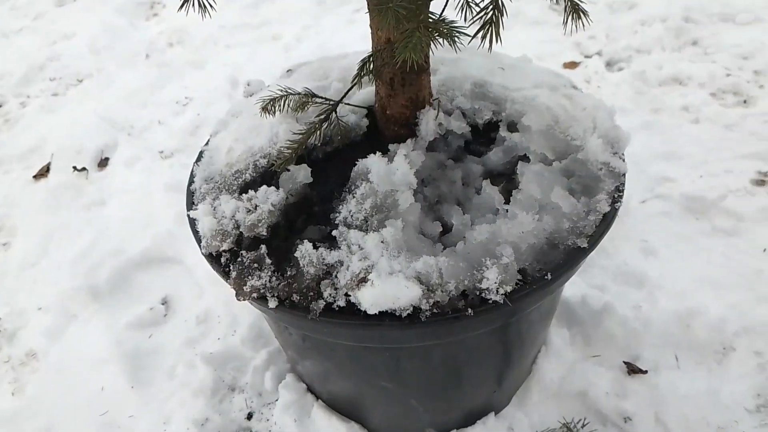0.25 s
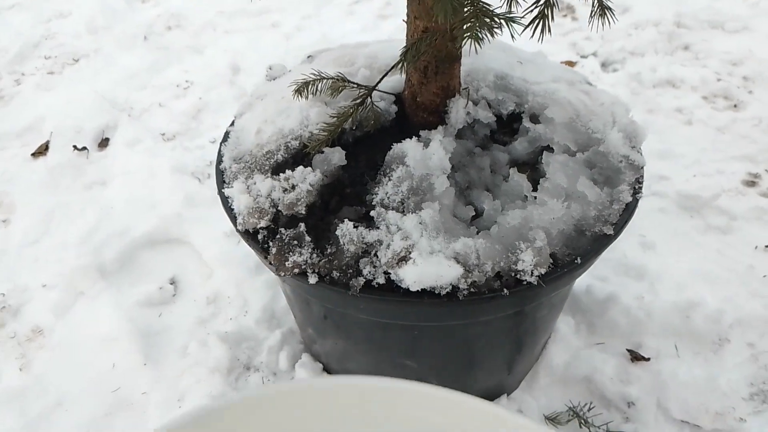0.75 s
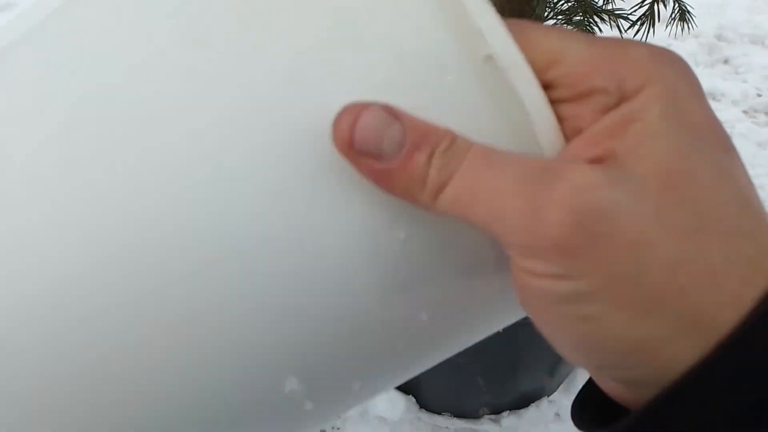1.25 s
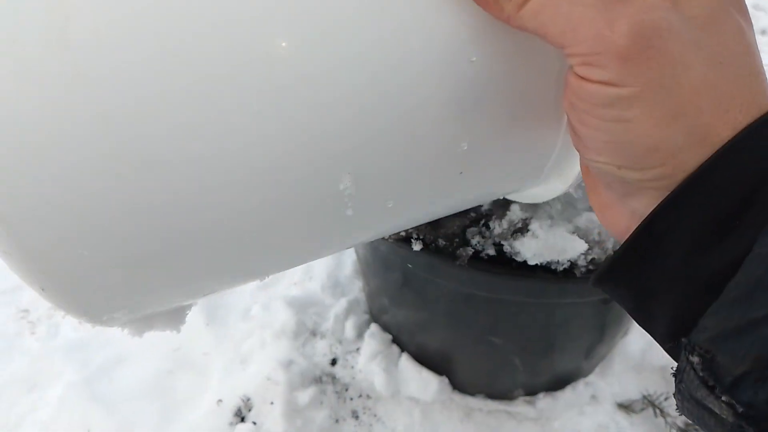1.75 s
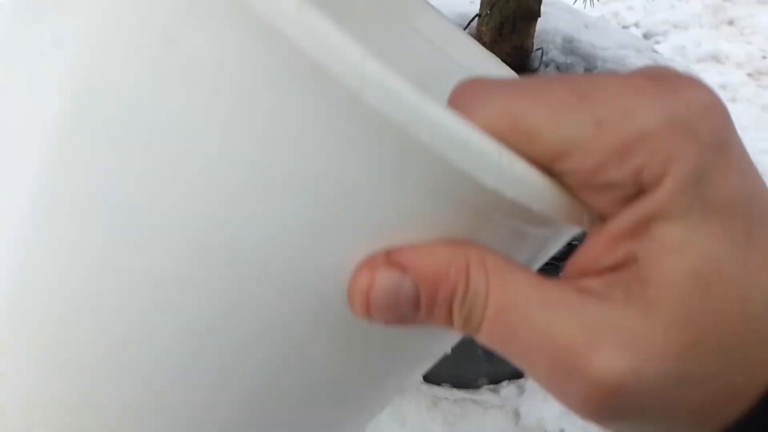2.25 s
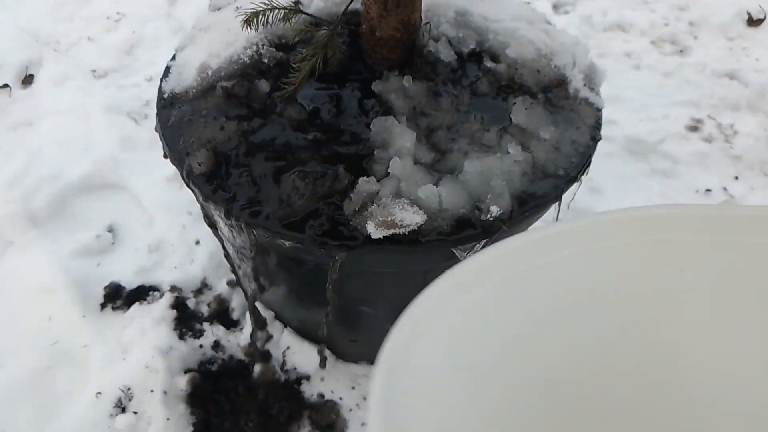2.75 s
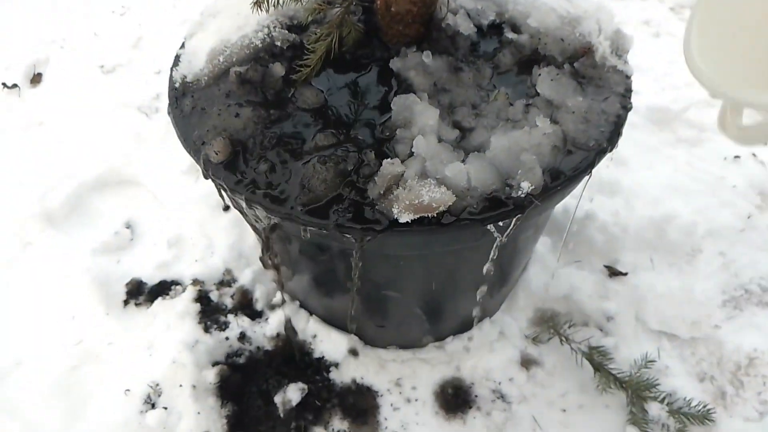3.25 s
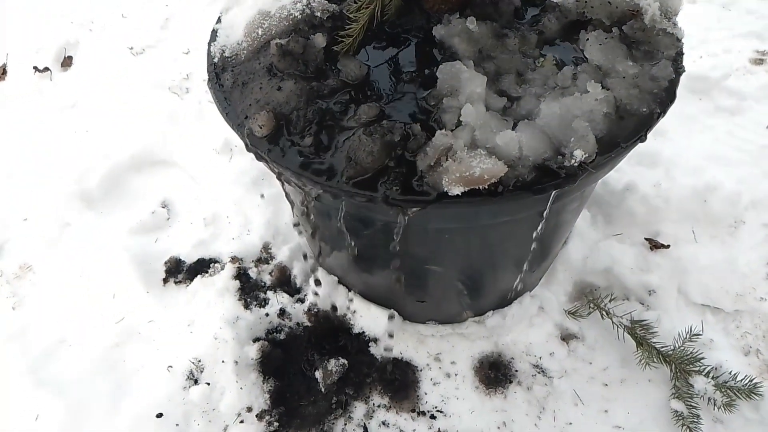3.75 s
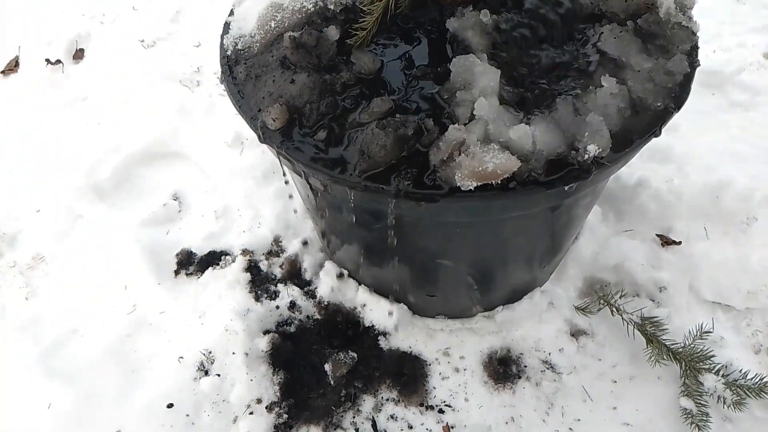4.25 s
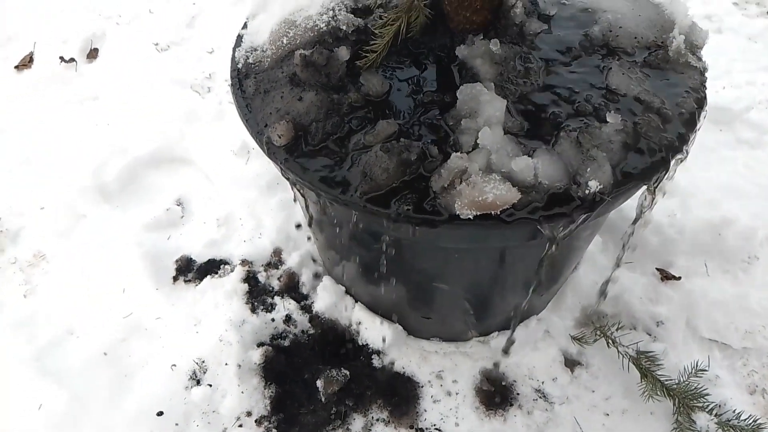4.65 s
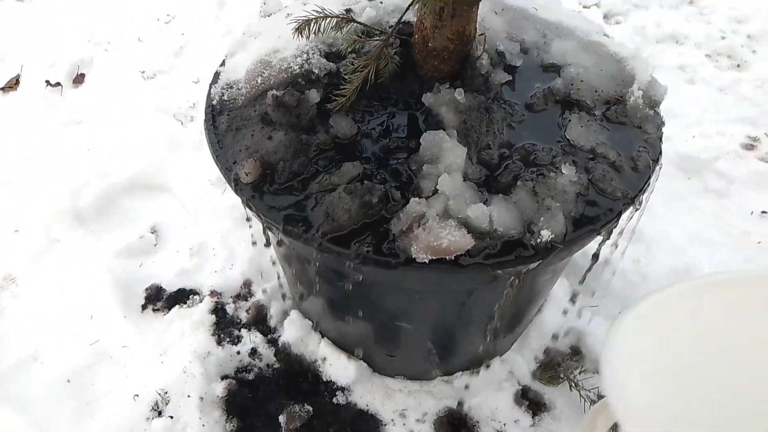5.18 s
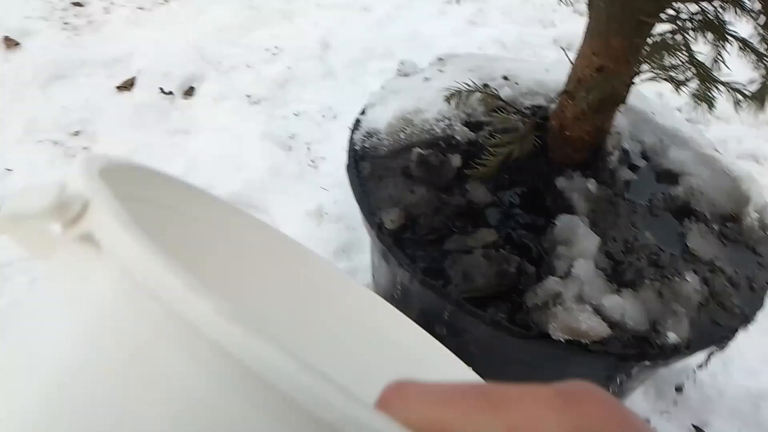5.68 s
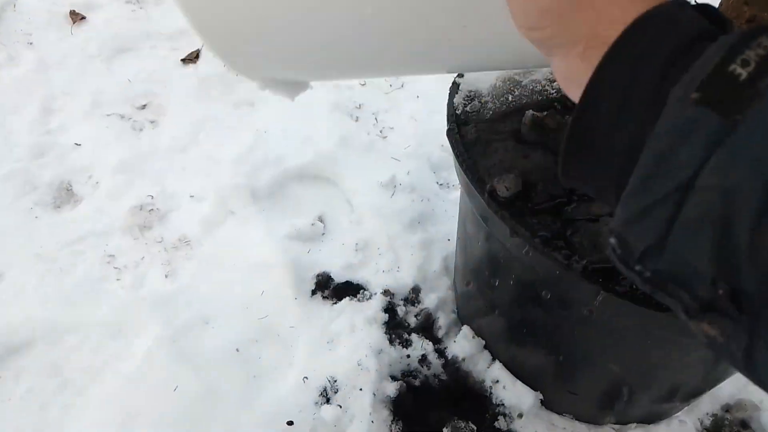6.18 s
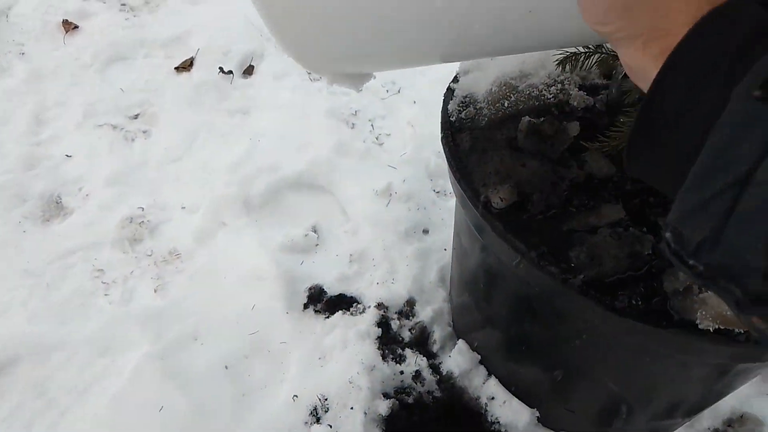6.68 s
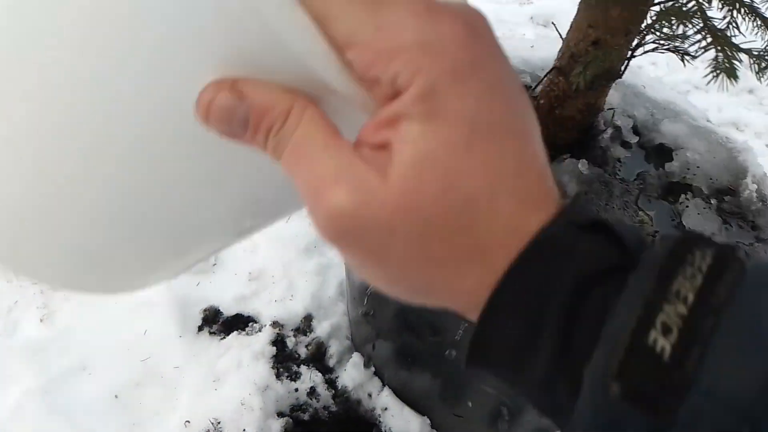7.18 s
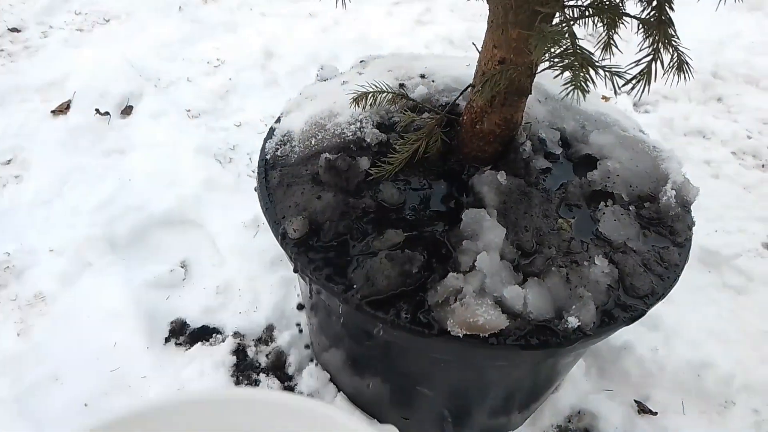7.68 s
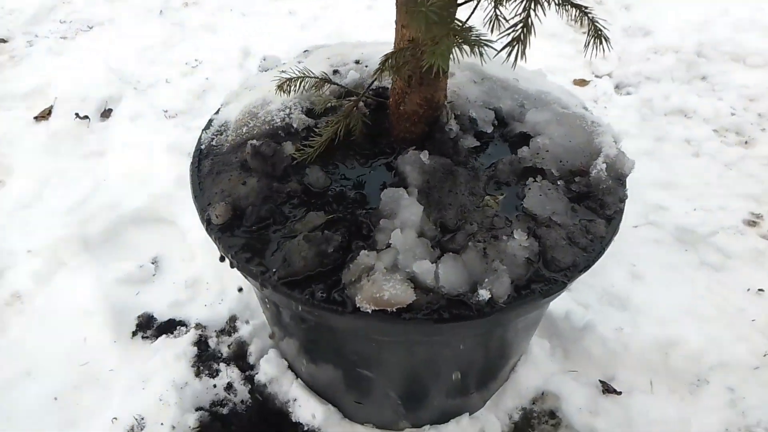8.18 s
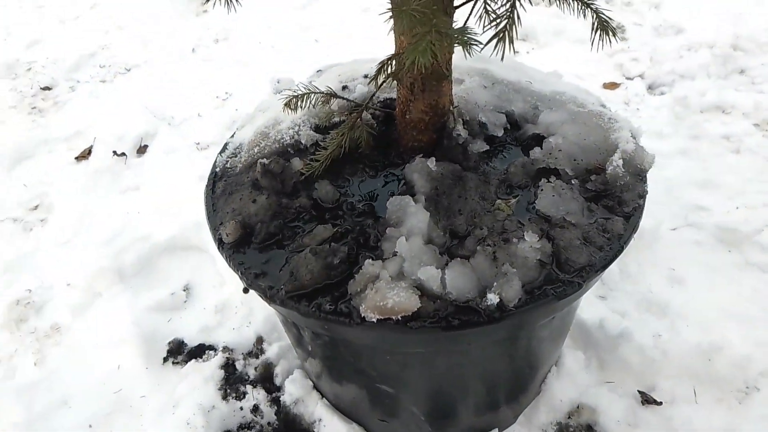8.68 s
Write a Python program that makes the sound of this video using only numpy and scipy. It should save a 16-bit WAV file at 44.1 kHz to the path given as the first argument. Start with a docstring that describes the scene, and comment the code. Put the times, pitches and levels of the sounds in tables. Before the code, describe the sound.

A close mono microphone with a bright, hissy treble catches water poured into a snow-filled plant pot. It starts silent, then cloth rubs and faint gurgling leads into a dense rush of sharp droplets and wet plops running off the rim. The spill dries up, a sleeve brushes past again, and weak drips remain with hollow plastic knocks and scuffs, finger squeaks and dull handling thumps in still air.

```python
"""Snowy ground outdoors: water from a plastic bucket floods a snow-heaped plant pot, spills and spatters on the snow.
Clumped clicks, damped bubble tones and ringing pot-wall modes make the spill; single drops snap and plop over it.
The bucket knocks, scuffs and gurgles through damped modes, and fingers squeak on it in rising tones.
A jacket sleeve swishes in shaped noise, over spray, soft rumble and bumps of the hand. The mono microphone sits
behind a port that rings near 10 kHz; the sound begins after a short silence."""
import sys
import numpy as np
from scipy import signal
from scipy.fft import rfft, irfft
from scipy.io import wavfile
from scipy.ndimage import uniform_filter1d, map_coordinates

SR = 44100
rng = np.random.default_rng(int(sys.argv[2]) if len(sys.argv) > 2 else 0)


def output_pcm(signal):
    """Save a mono or channel-first signal as 16-bit PCM at the path in sys.argv[1].

    Samples are clipped to [-1, 1] before scaling.
    """
    pcm = np.clip(np.atleast_2d(signal).T, -1, 1) * 32767
    wavfile.write(sys.argv[1], SR, np.round(pcm).astype(np.int16))


def volts_from_db(level):
    """Convert decibel levels to linear amplitude ratios."""
    exponent = np.asarray(level, float) / 20
    return 10 ** exponent


N = 393813


def unit(x):
    """Scaled to rms 1."""
    return x / np.sqrt(np.mean(x ** 2) + 1e-20)


def peak(x):
    """Scaled to a peak of 1."""
    return x / np.abs(x).max()


def curves(rows):
    """One value per sample for each column after the time."""
    s, *cols = np.transpose(rows)
    return np.array([np.interp(np.arange(N) / SR, s, c, left=c[0], right=c[-1]) for c in cols])


def during(rows):
    """1 between the first and last time of a table, 0 elsewhere."""
    t = np.arange(N) / SR
    return (t > rows[0][0]) & (t < rows[-1][0])


def swell(start, length, db, rise_db_s, fall_db_s):
    """A level in dB that climbs to db at start, holds for length and falls away."""
    t = np.arange(N) / SR
    before = np.clip(start - t, 0, None)
    after = np.clip(t - start - length, 0, None)
    return db - rise_db_s * before - fall_db_s * after


def wobble(rate):
    """A smooth random curve, rate knots a second."""
    knots = rng.standard_normal(int(N * rate / SR) + 4)
    return map_coordinates(knots, [np.arange(N) * rate / SR])


def steady(x, seconds):
    """Slow swings of level divided out."""
    power = np.abs(uniform_filter1d(x ** 2, int(seconds * SR)))
    return x / np.sqrt(power + 1e-3)


def response(spectrum):
    """Causal minimum-phase impulse response of (Hz, dB) points, closed steeply outside them."""
    f, db = np.transpose(spectrum)
    octaves = np.log2(np.fft.rfftfreq(4096, 1 / SR) + 1)
    below = np.clip(np.log2(f[0]) - octaves, 0, 2)
    above = np.clip(octaves - np.log2(f[-1]), 0, 2)
    level_db = np.interp(octaves, np.log2(f), db) - 30 * (below + above)
    # folding the cepstrum forward in time makes the response causal
    cep = irfft(np.log(volts_from_db(level_db)))
    cep[1:2048] *= 2
    cep[2049:] = 0
    return irfft(np.exp(rfft(cep)))


def coloured(x, spectrum):
    """x through the spectrum, at rms 1."""
    return unit(signal.fftconvolve(x, response(spectrum))[:N])


def modes(table, t):
    """One damped sine per (Hz, dB, t60) row."""
    hz, db, t60 = np.transpose(table)[:, :, None]
    return volts_from_db(db - 60 * t / t60) * np.sin(2 * np.pi * hz * t)


def crackle(per_s, spread_db, clump_db, clumps_per_s):
    """Random clicks of uneven size that arrive in clumps, at rms 1."""
    when, size, sign = rng.random((3, N))
    sizes = volts_from_db(-spread_db * np.log(size + 0.014))
    clicks = (when < per_s / SR) * sizes * np.sign(sign - .5)
    return unit(clicks * volts_from_db(clump_db * wobble(clumps_per_s)))


def bubbles(per_s, centre_hz, spread, cycles, uneven_db, life=256):
    """Short damped tones of scattered pitch and size, at rms 1; life is in samples."""
    when, pitch, size = rng.random((int(per_s * N / SR), 3)).T[:, :, None]
    ratio = np.exp(spread * np.log(pitch / (1 - pitch)) / 2)
    turns = np.minimum(centre_hz * ratio, SR / 4) * np.arange(life) / SR
    strength = np.sqrt(ratio) * volts_from_db(-uneven_db * np.log(size + 0.0062))
    tones = strength * np.sin(2 * np.pi * turns) * turns * np.exp(-turns / cycles)
    where = (when * N).astype(int) + np.arange(life)
    return unit(np.bincount(where.ravel(), tones.ravel(), N + life)[:N])


def patchy(x, depth_db):
    """The colour flickers: random gains in patches about 1.5 kHz wide and 6 ms long."""
    z = signal.stft(x, nperseg=128)[2]
    across = uniform_filter1d(rng.standard_normal(z.shape), size=4, axis=0)
    field = unit(uniform_filter1d(across, size=4, axis=1))
    # the second term keeps the mean power
    gain_db = depth_db * field - depth_db ** 2 * np.log(10) / 20
    return signal.istft(z * volts_from_db(gain_db), nperseg=128)[1][:N]


# overflow, one table per spell: (time [s], fine droplet level [dB], big droplets relative to fine [dB])
OVERFLOW = [
    [(1.55, -60.5, -15.5), (1.78, -65, -3), (1.87, -54.5, -8), (2.28, -60, -10), (2.38, -39, -19.5),
     (2.71, -41, -10), (2.84, -46.5, -12), (3.01, -36, -10), (3.27, -37, -10.5), (4.15, -45, -20.5),
     (4.56, -50, -18), (4.8, -36.5, -23.5), (5.05, -37, -17.5), (5.3, -46.5, -13.5), (5.65, -79.5, 9)],
    [(6.15, -66, -7), (6.71, -64, -8.5), (7.55, -66.5, -9), (7.83, -63.5, -4), (8.52, -50, -19),
     (8.85, -74, -20), (8.93, -50, -18)],
]
# ringing pot wall: (mode frequency [Hz], relative level [dB], t60 [s])
POT_MODES = [(2788, 6.5, 0.034), (3300, -1, 0.063), (4090, -2.5, 0.12), (4580, -6.5, 0.05),
             (5260, -3, 0.055), (5920, 10, 0.037), (6595, 12.5, 0.024), (7690, 10.5, 0.022)]
# droplet snaps as heard through the microphone port: (frequency [Hz], relative level [dB])
SNAP_COLOUR = [(2940, -40), (5000, -19.5), (5900, -14.5), (6290, -23), (7760, -10.5), (9600, 11),
               (10600, 9), (13200, -16.5), (15900, -9.5), (16300, -69)]
# thin ticks at the very top: (frequency [Hz], relative level [dB])
TICK_COLOUR = [(10000, -38), (12500, 21), (15800, 13), (16500, -29)]
# wet thuds and splashes: (frequency [Hz], relative level [dB])
WET_COLOUR = [(700, -21.5), (1500, -13.5), (2300, 0.5), (4000, 4), (5900, 4), (6300, 0), (7500, 14),
              (8500, -11.5)]


def spatter():
    """The stream breaks into droplets: clumps snap brightly; bubbles and thuds sound lower and ring the pot wall."""
    total = 0
    wall = modes(POT_MODES, np.arange(4096) / SR).sum(axis=0)
    # the heavy spell is dense and blurred, the late trickle sparse with more thin ticks
    for rows, snaps_per_s, tick_share in zip(OVERFLOW, (4000, 700), (.05, .18)):
        fine_db, coarse_db = curves(rows)
        clumps = volts_from_db(np.minimum(6.8 * wobble(170) + 2.5 * wobble(30), 9.5))
        snaps = clumps * crackle(snaps_per_s, spread_db=2.5, clump_db=6.0, clumps_per_s=410)
        snaps = coloured(snaps, SNAP_COLOUR)
        ticks = crackle(70, spread_db=-6.0, clump_db=-12.5, clumps_per_s=8)
        fine = snaps + tick_share * coloured(ticks, TICK_COLOUR)
        thuds = crackle(2000, spread_db=8.0, clump_db=9.0, clumps_per_s=170)
        thuds = unit(clumps ** 0.69 * thuds)
        blips = bubbles(1600, centre_hz=3600, spread=0.576, cycles=1.45, uneven_db=4.5)
        blips = unit(np.sqrt(clumps) * blips)
        wet = patchy(0.75 * thuds + 0.3 * blips, depth_db=5.5)
        ringing = unit(signal.fftconvolve(wet, wall)[:N])
        coarse = coloured(wet, WET_COLOUR) + 0.56 * ringing
        mix = steady(fine, 0.098) + volts_from_db(coarse_db) * steady(coarse, 0.117)
        total = total + during(rows) * volts_from_db(fine_db) * mix
    return total


# single drops snapping: (time [s], snap level [dB], bright tick relative to snap [dB])
DROP_SNAPS = [(0.7804, -21.5, -29), (0.897, -28, -23), (0.967, -26, -27), (2.3777, -34, -30),
              (2.4132, -16.5, -36), (2.52, -17.5, -27), (2.649, -18, -33), (2.7042, -25.5, -25),
              (2.8314, -25, -38), (2.9336, -19.5, -22), (3, -15, -33), (3.0146, -22, -21),
              (3.0455, -16, -34), (3.0576, -12.5, -30), (3.099, -21, -8), (3.1144, -19, -19),
              (3.144, -17, -24), (3.1781, -18, -23), (3.213, -15.5, -22), (3.2732, -26, -20),
              (3.2974, -18, -24), (3.3644, -17.5, -22), (3.3868, -12.5, -15), (3.4844, -15, -14),
              (3.6, -19, -24), (3.786, -15.5, -32), (3.827, -18, -33), (3.9371, -31, -21),
              (3.9544, -17.5, -36), (4.017, -16, -31), (4.033, -21, -30), (4.0576, -25.5, -37),
              (4.1322, -9, -38), (4.164, -15.5, -29), (4.3479, -20, -34), (4.4829, -15.5, -32),
              (4.6088, -20.5, -24), (4.63, -28, -12), (4.648, -13.5, -21), (4.7335, -35, -22),
              (4.7554, -28, -21), (4.799, -10.5, -26), (4.862, -25, -7), (4.9224, -12.5, -9),
              (4.98, -17.5, -4), (5.0562, -19, -14), (5.068, -18, -16), (5.094, -14, -8.5),
              (5.1236, -9.5, -11), (5.1526, -16.5, -30), (5.209, -21.5, -8), (5.227, -18.5, -8),
              (5.402, -25.5, -24), (5.453, -26, -22), (5.504, -29, -35), (5.5529, -23, -30),
              (5.7153, -23, -30), (5.977, -27.5, -29), (6.018, -24.5, -34), (6.3876, -23, 0),
              (6.4433, -34, -13), (6.506, -31.5, -22), (6.6745, -34.5, -16), (6.72, -36, -18),
              (6.766, -38.5, -5), (6.814, -35, -22), (7.075, -35, -26), (7.1617, -39, -28),
              (7.324, -41.5, -11), (7.367, -33.5, -19), (7.52, -37.5, -10), (7.6118, -40, -20),
              (7.7475, -39, -2), (7.999, -32, -25), (8.1374, -29.5, -31), (8.329, -21, -36),
              (8.4723, -28, -47), (8.533, -26, -28), (8.557, -28, -22), (8.804, -42.5, -27)]


def drops():
    """A drop lands with one sharp snap among a few weaker spikes of fading noise, with a bright tick on top."""
    out, t = np.zeros(N + SR), np.arange(1024) / SR
    port, bright = response(SNAP_COLOUR), response(TICK_COLOUR)
    for s, db, bright_db in DROP_SNAPS:
        spikes = rng.standard_normal(len(t)) ** 3  # cubing leaves a few tall ones
        t60 = 0.017 * (.5 + rng.random())
        burst = peak(spikes * volts_from_db(-60 * t / t60) * (1 - np.exp(-t / 0.00027)))
        burst[round(.0008 * SR)] += 1.6  # the sharp snap
        snap, tick = [peak(signal.fftconvolve(burst, h)[:len(t)]) for h in (port, bright)]
        out[round(s * SR):][:len(t)] += volts_from_db(db) * (snap + volts_from_db(bright_db) * tick)
    return out[:N]


# heavier drops landing: (time [s], hollow ring level [dB], hollow pitch [Hz])
HEAVY_DROPS = [(0.777, -41.5, 4600), (0.849, -36, 1520), (0.864, -36.5, 2330), (0.9004, -27.5, 5940),
               (0.972, -37.5, 1470), (1.735, -50, 5200), (1.809, -52, 3950), (1.828, -51, 3990),
               (1.8726, -37, 1950), (1.9045, -41.5, 1290), (1.909, -40, 4550), (1.9617, -44.5, 5700),
               (2.0162, -43.5, 1960), (2.033, -40.5, 1320), (2.1548, -48.5, 1810), (2.637, -39, 2500),
               (2.698, -34, 3830), (2.7329, -35, 3270), (2.833, -46.5, 2930), (3.001, -28, 5900),
               (3.046, -28.5, 5940), (3.0998, -24, 6250), (3.22, -23.5, 5070), (3.263, -28.5, 3900),
               (3.309, -32, 5000), (3.34, -35, 4750), (3.3757, -33, 5270), (3.433, -31.5, 3900),
               (3.4565, -33, 5770), (3.5986, -40.5, 2690), (3.758, -31.5, 5460), (3.883, -42.5, 2680),
               (4.132, -38, 4200), (4.1654, -32.5, 5200), (4.348, -41, 1280), (4.4513, -50.5, 4870),
               (4.4829, -36.5, 5800), (4.61, -42, 5940), (4.6494, -35.5, 5750), (4.757, -47, 2600),
               (4.7702, -38, 5000), (4.813, -39, 6300), (4.8773, -35.5, 4800), (4.949, -37, 4170),
               (4.9212, -40, 5700), (4.9805, -36.5, 4760), (5.006, -40.5, 3600), (5.034, -35, 4500),
               (5.054, -34, 3840), (5.0944, -29, 5460), (5.123, -36, 5550), (5.152, -34.5, 5500),
               (5.1796, -35, 3700), (5.2088, -44.5, 1300), (5.2273, -36.5, 3850), (5.273, -43, 3760),
               (5.316, -45, 3100), (5.354, -41, 4810), (5.454, -32, 3800), (5.504, -46, 4660),
               (5.551, -47, 4640), (5.242, -43, 4900), (5.298, -44.5, 5970), (5.58, -54, 4200),
               (5.606, -52, 3600), (6.031, -46.5, 1370), (6.3866, -45.5, 2310), (6.529, -50, 1580),
               (6.6688, -42, 3200), (6.76, -48, 2430), (7.8, -55.5, 4400), (8.246, -40, 1900),
               (8.274, -44.5, 1590), (8.32, -36, 2240), (8.328, -38.5, 4200), (8.481, -41.5, 2530),
               (8.9012, -44.5, 1560)]
PLOP_RISE_S = .0028


def plops():
    """A heavier drop digs a wet hollow that rings a few cycles over a broad splash that also rings the pot wall."""
    out, t = np.zeros(N + SR), np.arange(1024) / SR
    snow, wall = response(WET_COLOUR), modes(POT_MODES, t).sum(axis=0)
    t60 = np.where(t < PLOP_RISE_S, .009, .016)  # rise, then fall
    envelope = volts_from_db(-60 * np.abs(t - PLOP_RISE_S) / t60)
    for s, db, hz in HEAVY_DROPS:
        noise = rng.standard_normal((2, len(t))) * envelope
        noise[1, round(PLOP_RISE_S * SR)] += 6.7 * np.sign(noise[0, 0])  # the hard first contact
        hollow = np.sin(2 * np.pi * hz * t) * volts_from_db(-60 * t * hz / 7) * (t * hz) ** 0.85
        ring = np.convolve(noise[0], hollow[:256])[:len(t)]
        splash = signal.fftconvolve(noise[1], snow)[:len(t)]
        pot = signal.fftconvolve(splash, wall)[:len(t)]
        plop = peak(ring) + 0.83 * peak(splash) + 0.26 * peak(pot)
        out[round((s - .002) * SR):][:len(t)] += volts_from_db(db) * plop
    return out[:N]


# ringing bucket: (mode frequency [Hz], relative level [dB], t60 [s])
BUCKET_MODES = [(277, -2.5, 0.17), (303, 9, 0.07), (435, 6.5, 0.02), (557, -9.5, 0.051), (774, 2, 0.01),
                (947, -9.5, 0.034), (1360, 1, 0.019), (1720, 1, 0.033), (2000, 3.5, 0.012),
                (2570, 7.5, 0.012), (3354, -3.5, 0.029), (3850, -8, 0.014), (4460, -19.5, 0.034)]
# bucket knocks: (time [s], wall level [dB], bottom relative to wall [dB], rim relative to wall [dB])
BUCKET_KNOCKS = [(2.367, -55, -10, -7), (2.467, -67, 18.5, -20), (2.533, -50.5, 15.5, -17),
                 (2.564, -59, 11.5, -10), (3.019, -51, -13, -15), (3.052, -46.5, -27, -15),
                 (3.241, -48, -29, 2.5), (4.349, -36.5, -6.5, 0.5), (4.407, -40.5, -15, -17),
                 (4.462, -52, -14, -5), (4.537, -44, -18, -22), (4.562, -40.5, -23, -30),
                 (4.643, -58, 0, 3), (4.692, -56, 1, -6), (6.533, -41.5, -15, -13.5), (7.166, -58.5, 4, -2),
                 (7.914, -50, -6, 4.5), (8.008, -52, -21, -8), (8.081, -47, -23, 0),
                 (8.129, -44.5, -31, -6), (8.164, -41, -28, -23), (8.205, -51, -18, 0),
                 (8.244, -56, -14, 12), (8.257, -48.5, -28, 7), (8.279, -50, -23, -13), (8.48, -52, 11, -2)]
# hands scuffing the bucket: (time [s], length [s], wall level [dB], bottom and rim relative to wall [dB])
HAND_SCUFFS = [(2.496, 0.11, -67.5, 0), (4.357, 0.023, -52.5, -14), (4.526, 0.076, -57.5, -18),
               (7.917, 0.033, -58, 4.5), (7.96, 0.26, -75, 3), (8.242, 0.088, -67, -0.5)]
SCUFF_SWELL_DB_S, SCUFF_FADE_DB_S = 1200, 305


def bucket():
    """Rough pushes (knocks) and runs of small ones (scuffs) ring wall, bottom and rim; gurgling rings the rim."""
    out, t = np.zeros(N + SR), np.arange(SR // 4) / SR
    hz = np.array(BUCKET_MODES)[:, 0]
    wall, rim = hz < 800, hz > 1100
    bottom = ~wall & ~rim
    ringing = modes(BUCKET_MODES, t)
    for s, db, bottom_db, rim_db in BUCKET_KNOCKS:
        strength = volts_from_db(3 * rng.standard_normal(len(BUCKET_MODES)))  # each knock excites the modes unevenly
        push = rng.standard_normal(2048) * volts_from_db(-60 * t[:2048] / 0.054)
        push *= 1 - np.exp(-t[:2048] / 0.00071)
        low, middle, high = [peak(signal.fftconvolve((part * strength) @ ringing, push)[:len(t)])
                             for part in (wall, bottom, rim)]
        knock = low + volts_from_db(bottom_db) * middle + volts_from_db(rim_db) * high
        out[round((s - .003) * SR):][:len(t)] += volts_from_db(db) * knock
    out = out[:N]
    rubbing = crackle(4000, spread_db=6.5, clump_db=3.5, clumps_per_s=90)
    deep, light = [steady(unit(signal.fftconvolve(rubbing, part @ ringing)[:N]), 0.12)
                   for part in (wall, ~wall)]
    light = patchy(light, depth_db=3)
    for s, length, db, light_db in HAND_SCUFFS:
        level_db = swell(s, length, db, SCUFF_SWELL_DB_S, SCUFF_FADE_DB_S)
        out += volts_from_db(level_db) * (deep + volts_from_db(light_db) * light)
    slosh = gurgles()
    return out + slosh + 0.011 * signal.fftconvolve(slosh, rim @ ringing)[:N]


# water gurgling in the tipped bucket: (time [s], length [s], level [dB], bubble pitch [Hz])
GURGLE_RUNS = [(0.841, 0.015, -59, 2260), (1.721, 0.16, -67, 1810), (1.954, 0.22, -69.5, 1630),
               (2.43, 0.38, -57.5, 3060)]
BUBBLE_SAMPLES, GURGLE_PER_S = 768, 520
GURGLE_SWELL_DB_S, GURGLE_FADE_DB_S = 400, 250


def gurgles():
    """Dense, rough runs of bubbles scattered around one pitch."""
    out = 0
    for s, length, db, hz in GURGLE_RUNS:
        level_db = swell(s, length, db, GURGLE_SWELL_DB_S, GURGLE_FADE_DB_S) + 2.5 * wobble(60)
        run = bubbles(GURGLE_PER_S, centre_hz=hz, spread=0.34, cycles=3.3, uneven_db=4.5,
                      life=BUBBLE_SAMPLES)
        out = out + volts_from_db(level_db) * steady(run, 0.093)
    return out


# finger squeaks: (time [s], level [dB], pitch at that time [Hz])
FINGER_SQUEAKS = [(8.49, -61, 2800), (8.52, -58, 2380)]
SQUEAK_RISE_HZ_S, SQUEAK_FADE_DB_S = 39000, 900


def squeak():
    """Wet skin slips on plastic with short, rough rising tones."""
    out, t = 0, np.arange(N) / SR
    for s, db, centre_hz in FINGER_SQUEAKS:
        hz = np.clip(centre_hz + SQUEAK_RISE_HZ_S * (t - s), 0, SR / 4)
        level_db = swell(s, 0, db, SQUEAK_FADE_DB_S, SQUEAK_FADE_DB_S) + 3 * wobble(360)
        rough_hz = hz * (1 + 0.015 * wobble(350))
        out = out + volts_from_db(level_db) * np.sin(2 * np.pi * np.cumsum(rough_hz) / SR)
    return out


# sleeve strokes: (time of full level [s], hold [s], port hiss level [dB], fade [dB/s],
# smooth cloth hiss relative to port [dB], low rush relative to port [dB])
SLEEVE_STROKES = [(.75, 0.049, -60, 30.2, 0, -4.5), (1.125, 0.27, -49.5, 90, 2, -14),
                  (5.788, 0.25, -45.5, 32, -8.5, -24), (7.196, 0.75, -66.5, 25, 1.5, -12.5),
                  (8.21, 0.28, -60.5, 98, -8, -9)]
STROKE_SWELL_DB_S = 42
# still air: port hiss, smooth hiss, low rush (level [dB])
STILL_AIR_DB = [-99, -84.5, -82]
# fine spray over the heavy overflow, at a flow of SPRAY_AT_DB: port hiss, smooth hiss, low rush (level [dB])
SPRAY_LEVEL_DB = [-52.5, -61.5, -82.5]
# growth of the same three with the flow (gain per flow level [dB/dB])
SPRAY_GROWTH = [0.79, 0.78, 0.5]
SPRAY_AT_DB = -45
# hiss ringing in the microphone port: (frequency [Hz], relative level [dB])
PORT_COLOUR = [(8500, -22.5), (9300, -3), (9900, 12.5), (10500, -3), (11300, -25)]
# smooth cloth hiss: (frequency [Hz], relative level [dB])
CLOTH_COLOUR = [(1470, -57), (2500, -33), (3570, -21.5), (4590, -16), (5010, -17), (8300, -5.5), (10000, 2),
                (15100, -13), (16100, -55)]
# low rush: (frequency [Hz], relative level [dB])
RUSH_COLOUR = [(100, -63), (170, -27.5), (249, -1.5), (402, 0), (450, -4), (610, -3), (1980, -6.5),
               (2970, -12.5), (3500, -9), (4550, -33), (7700, -120)]
# rumble: (frequency [Hz], relative level [dB])
RUMBLE_COLOUR = [(10, 6), (40, -20), (85, -4), (110, -20), (135, -16.5)]


def air():
    """Rubbing cloth and spray hiss in the port and smoothly across the treble, over a low rush and a rumble."""
    flow_db = curves(OVERFLOW[0])[0] - SPRAY_AT_DB
    spraying = during(OVERFLOW[0])
    gains = np.array([volts_from_db(still) + spraying * volts_from_db(db + grows * flow_db)
                      for still, db, grows in zip(STILL_AIR_DB, SPRAY_LEVEL_DB, SPRAY_GROWTH)])
    for s, hold, db, fall, cloth_db, rush_db in SLEEVE_STROKES:
        stroke = volts_from_db(swell(s, hold, db, STROKE_SWELL_DB_S, fall))
        gains += stroke * volts_from_db([[0], [cloth_db], [rush_db]])
    noise = rng.standard_normal((4, N))
    grit = .5 * crackle(3600, spread_db=4.0, clump_db=20.5, clumps_per_s=14)
    port = coloured(noise[0] * volts_from_db(2.23 * wobble(90)) + grit, PORT_COLOUR)
    wide = coloured(noise[1] * volts_from_db(3.1 * wobble(44)), CLOTH_COLOUR)
    rush = coloured(noise[2] * volts_from_db(2.0 * wobble(40)), RUSH_COLOUR)
    rumble = coloured(noise[3] * volts_from_db(5.8 * wobble(28.0)), RUMBLE_COLOUR)
    return (gains * [port, wide, rush]).sum(axis=0) + volts_from_db(-83.0) * rumble


# handling bumps: (time [s], level [dB], pitch [Hz])
HAND_BUMPS = [(7.909, -51, 71), (8.575, -53, 62), (8.72, -57, 49.3), (8.898, -50, 55)]


def thumps():
    """Slow bumps of the hand that holds the microphone: low damped sines with a soft onset."""
    out, t = np.zeros(N + SR), np.arange(SR // 4) / SR
    onset = 1 - np.exp(-t / 0.0082)
    for s, db, hz in HAND_BUMPS:
        bump = volts_from_db(db - 60 * t / 0.11) * np.sin(2 * np.pi * hz * t) * onset
        out[round(s * SR):][:len(t)] += bump
    return out[:N]


def scene():
    """All sources reach one microphone, copied to both channels."""
    near = spatter() + drops() + plops() + bucket() + squeak()
    # droplets and a thin shell radiate almost nothing in the bass
    bass_cut = signal.butter(8, 225, "high", fs=SR, output="sos")
    mono = signal.sosfilt(bass_cut, near) + thumps() + air()
    return np.array([mono, mono])


def low_pass(x):
    """Removes everything above the highest recorded frequency."""
    return signal.sosfilt(signal.butter(12, 17000, fs=SR, output="sos"), x)


def record(dry):
    """Silence, then a quick fade-in."""
    start_s, fade_s = .735, 0.017
    fade = np.clip((np.arange(N) / SR - start_s) / fade_s, 0, 1)
    return low_pass(dry * fade)


dry = scene()
out = record(dry)
output_pcm(out)
```